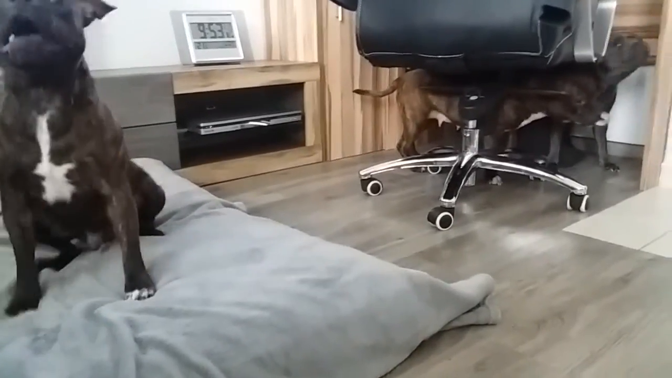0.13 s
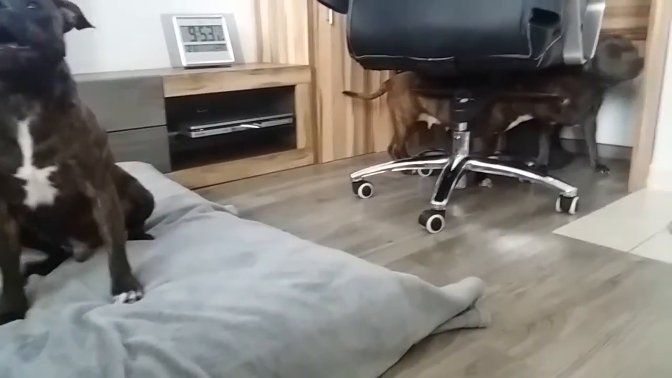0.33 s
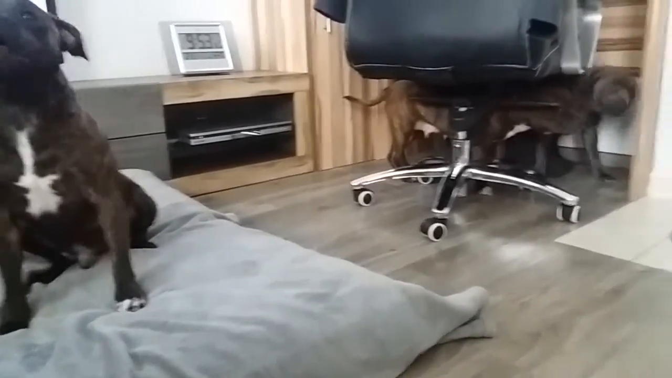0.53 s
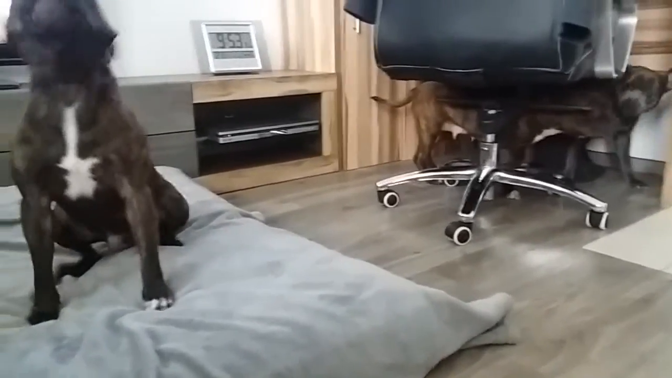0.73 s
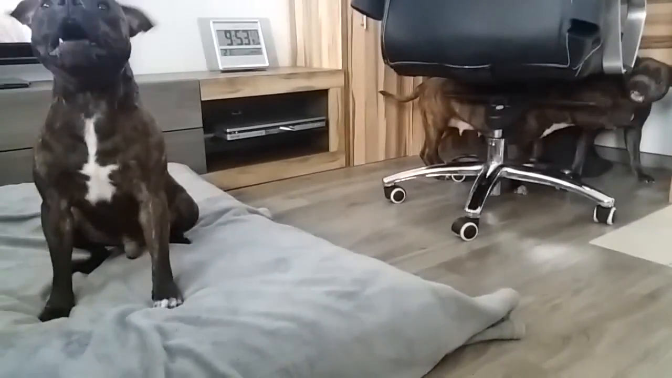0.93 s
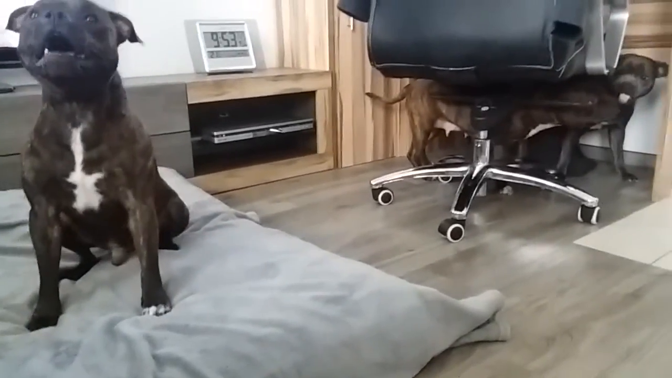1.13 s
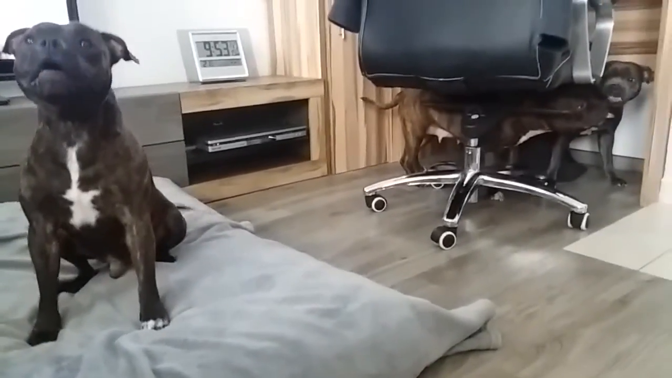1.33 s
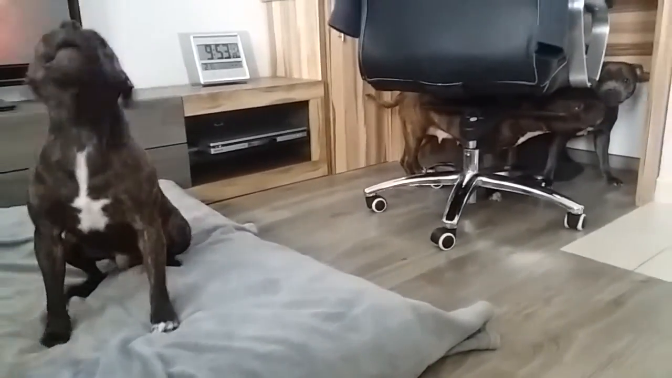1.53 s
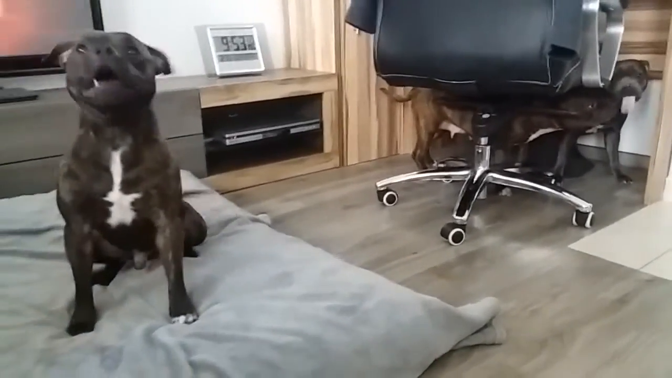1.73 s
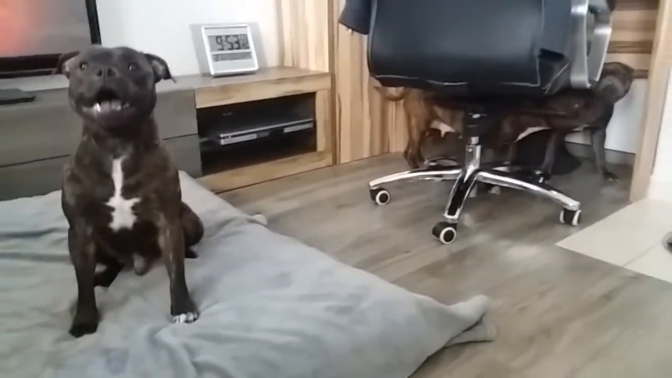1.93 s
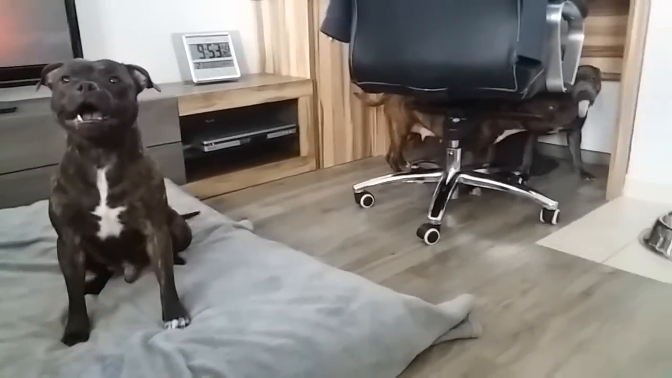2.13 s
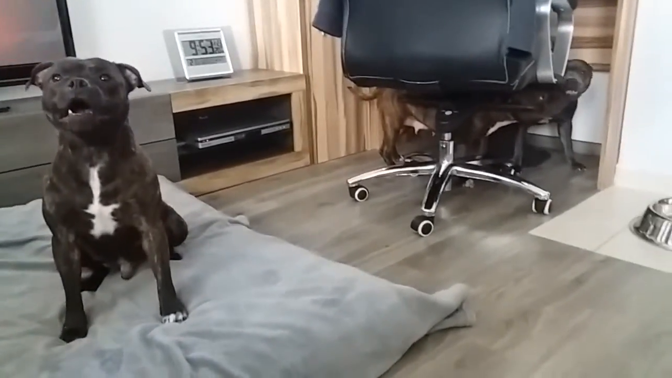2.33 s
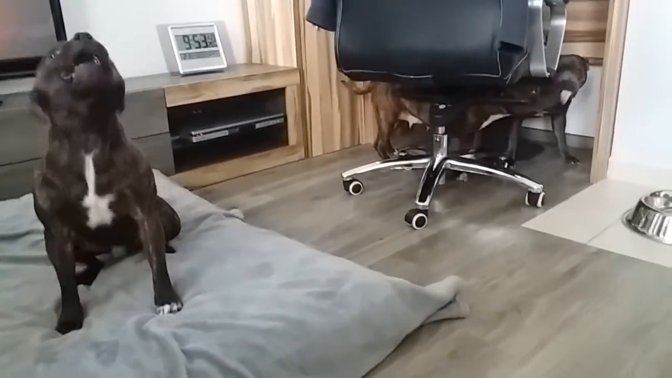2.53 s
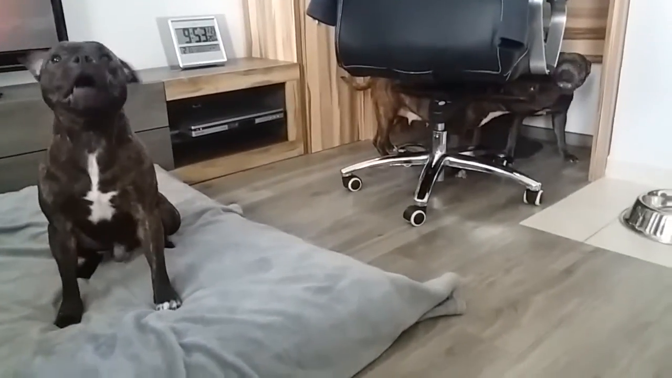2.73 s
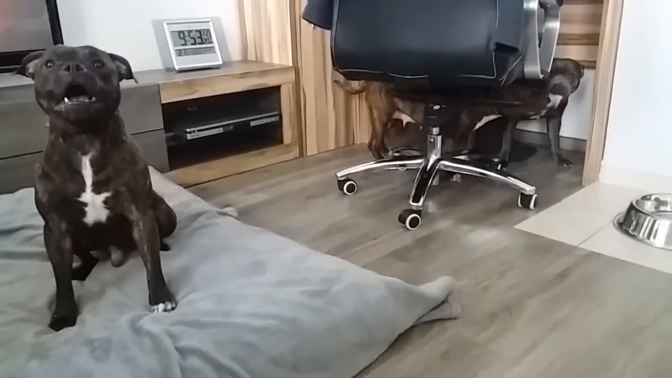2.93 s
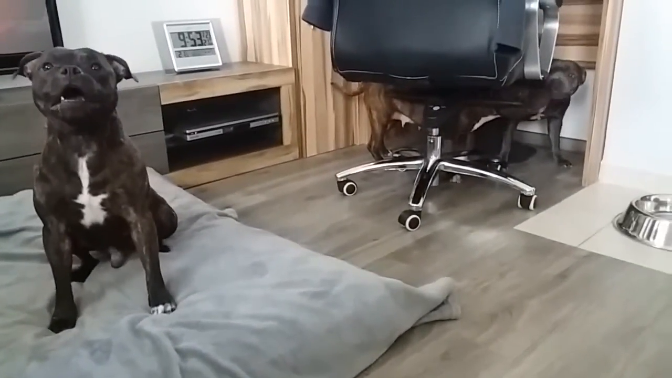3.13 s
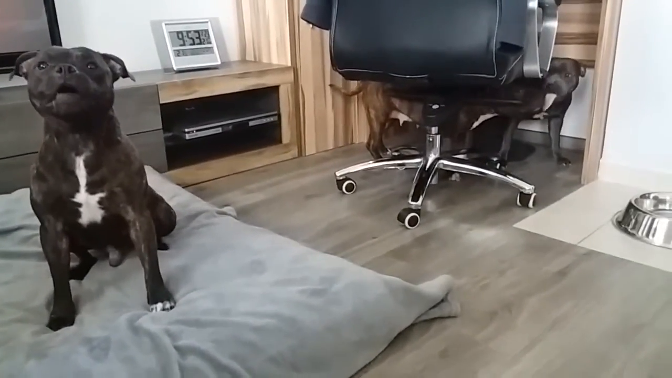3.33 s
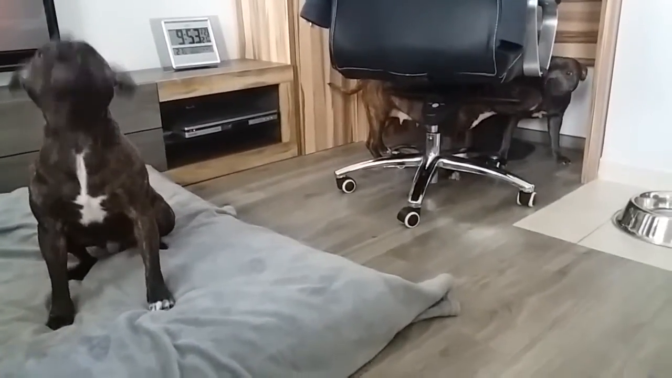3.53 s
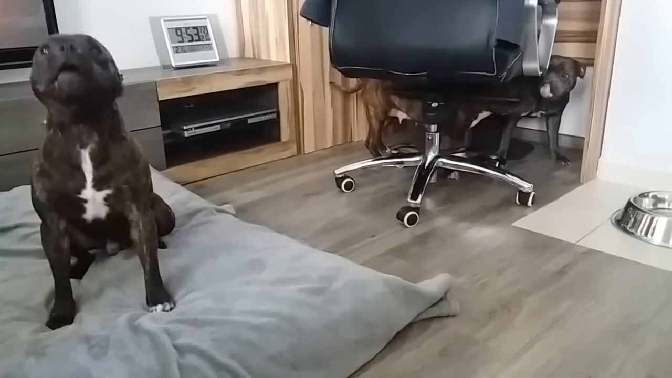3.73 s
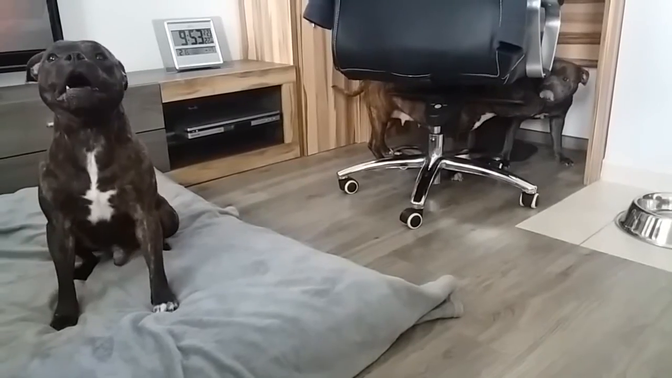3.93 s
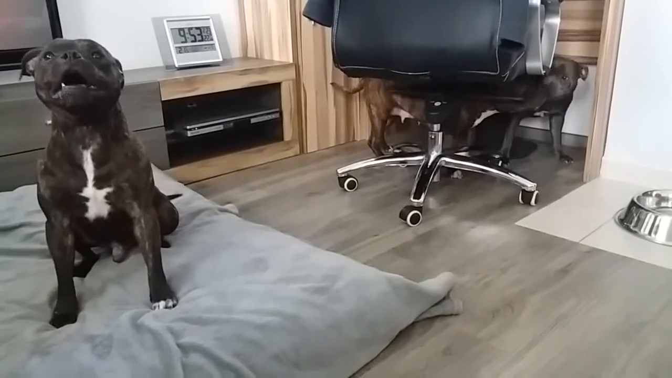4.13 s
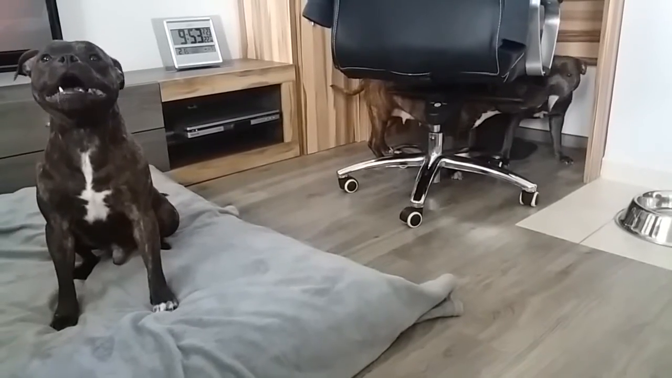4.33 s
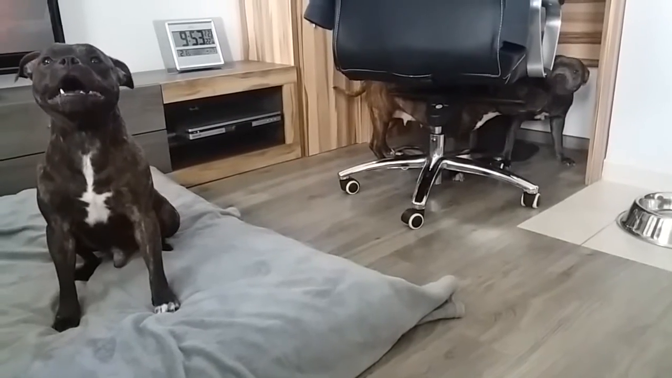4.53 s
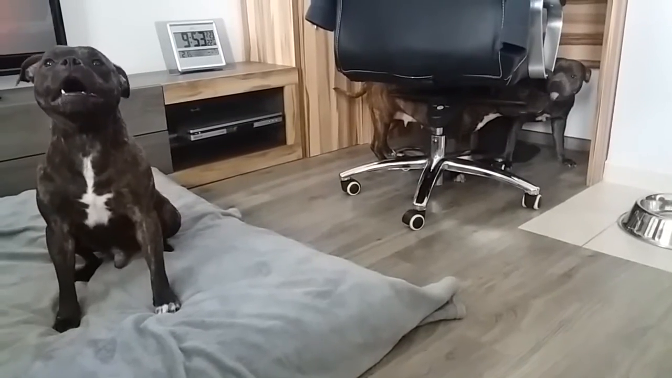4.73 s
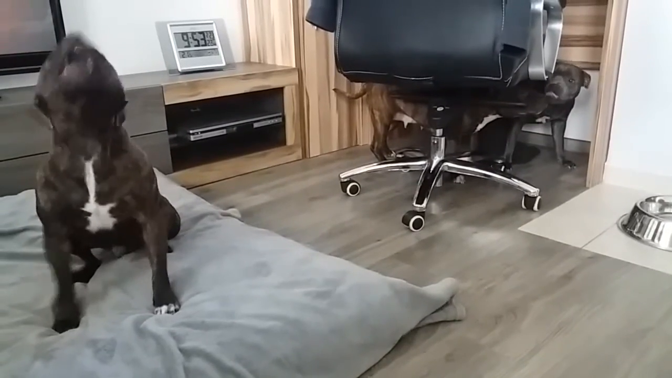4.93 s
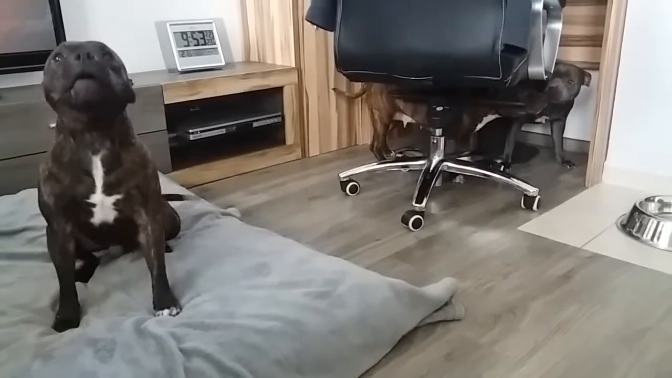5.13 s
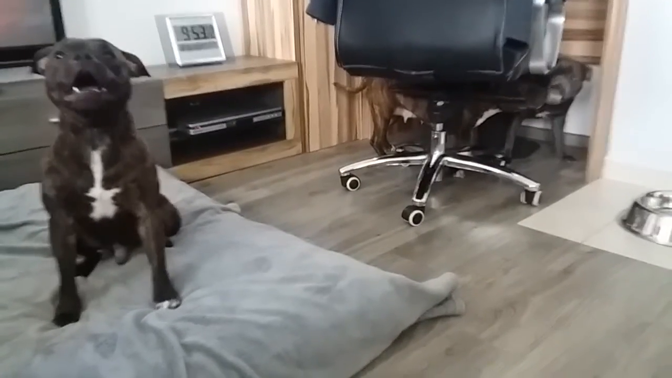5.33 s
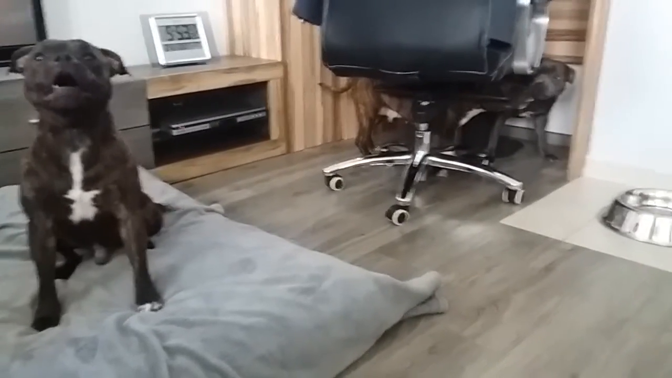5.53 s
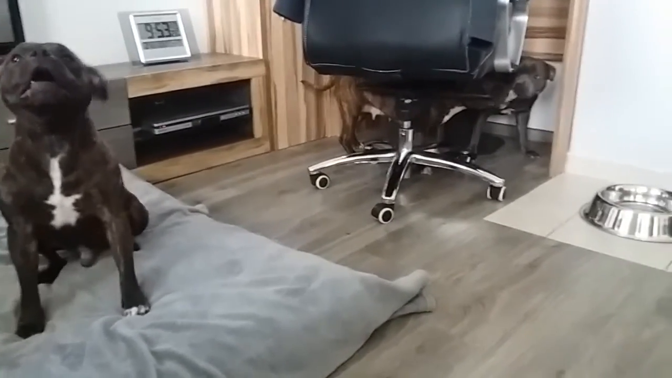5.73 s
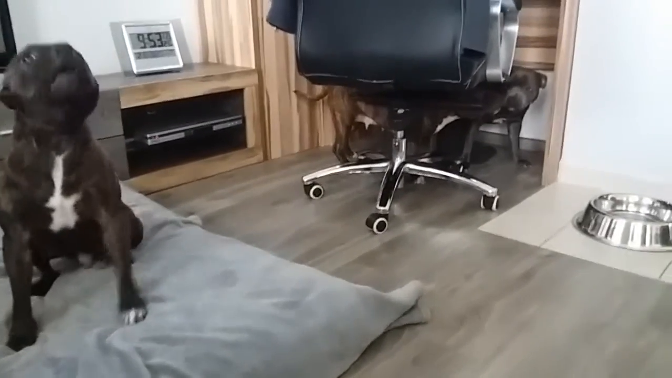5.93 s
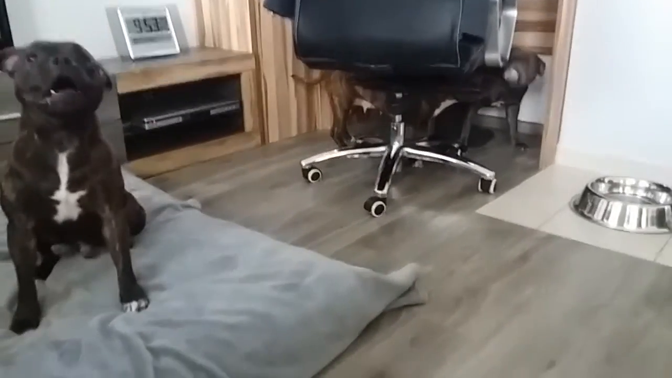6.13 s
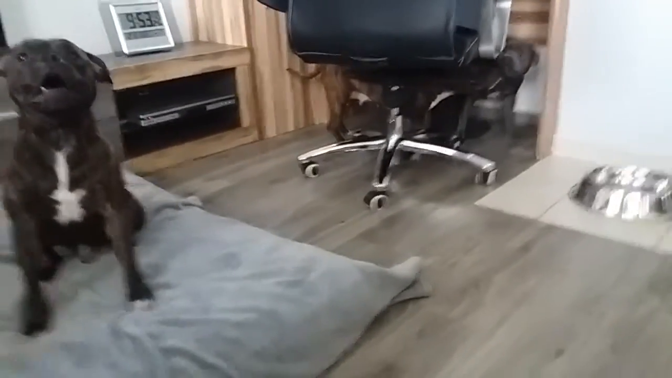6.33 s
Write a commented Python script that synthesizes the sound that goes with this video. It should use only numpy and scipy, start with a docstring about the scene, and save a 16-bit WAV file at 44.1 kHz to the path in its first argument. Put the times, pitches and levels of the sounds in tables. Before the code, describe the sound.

In a quiet living room with a hard floor, the echo of a bark dies away while loose metal jingles faintly. A stocky dog, close to the hand-held microphone, then gives short, hoarse single barks at about 0.6, 1.5, 2.5, 3.5, 4.9 and 5.8 seconds. Each opens with a small snap of the lips, the last four also with a tiny rising squeak. Some have a soft huff before or a breathy rasp after, and the room rings briefly after each one. Fingers tick and bump on the microphone's case: lightly near the start and at 1.1 and 4.1 seconds, then with a sharp click at 5.3 seconds and a few smaller ticks after it. A faint low rumble swells toward the end. At about 6.2 seconds the metal rattles again, briefly and louder, over the soft hush of the house.

```python
"""A living room with a hard floor: a stocky dog barks hoarsely, close to a hand-held camera.
Of its seven barks, the first is heard only as an echo. The others open with a snap of the lips, the last
four with a rising squeak, then swell, hold and drop away as the mouth moves. Some have a soft huff
before or a rasp after, and the room rings after each. Fingers tick and bump on the camera's case, a low
rumble comes and goes, and loose metal rattles and rings, faintly at first and louder at the end."""
import sys
import numpy as np
from scipy import signal
from scipy.fft import rfft, irfft
from scipy.io import wavfile
from scipy.ndimage import uniform_filter1d, minimum_filter1d

SR = 44100
rng = np.random.default_rng(int(sys.argv[2]) if len(sys.argv) > 2 else 0)


def unload_audio(sound):
    """Save the sound as a 16-bit wav file, at the path given as the first command line argument."""
    columns = np.transpose(np.atleast_2d(sound))
    # keep every value between -1 and 1, then stretch to whole-number steps
    steps = np.round(np.clip(columns, -1, 1) * 32767)
    wavfile.write(sys.argv[1], SR, steps.astype(np.int16))


N = 281308
LEAD = SR // 2  # spare samples for sounds that begin before time zero
FRAMES = dict(nperseg=1024, noverlap=896)  # how sound is sliced for filters that change over time


def dog():
    """All the dog's sounds: barks, with huffs, lip snaps, squeaks and rasps around them."""
    # t/s, base pitch/Hz, clean tone/dB, body/dB, cough/dB, swell depth/dB, swell/s, hold until/s,
    # effort/dB, jaw opening/factor, hiss/dB, hiss sag/(dB/s), jet/dB, teeth/dB, lip opening/factor
    barks = [(-0.18, 306.3, -23, -2, 9, 22.5, 0.025, 0.11, -13.5, 1.024, -29.5, 48, -14, -60, 0.99),
             (0.623, 346, -8.5, 0.5, 2.5, 27, 0.017, 0.096, -12.5, 1.062, -37, -56, 1, -59.5, 0.99),
             (1.471, 315, -4, 2.5, -5, 35.5, 0.039, 0.11, -14, 0.91, -39, 6, -9, -70, 0.96),
             (2.484, 317.2, 1, 0, 2.5, 21, 0.025, 0.12, -13, 1.068, -29.5, 41, 2.5, -63, 0.98),
             (3.532, 310.5, -13, -0.5, -7, 27.5, 0.0199, 0.13, -14.5, 1.04, -32, -10, 4, -63, 1.0),
             (4.939, 325.5, -3.5, -1.5, -3, 23, 0.013, 0.1, -12, 1.127, -25.5, 89, -1, -58.5, 0.99),
             (5.821, 303.1, -4, -0.5, -0.5, 22.5, 0.017, 0.093, -10.5, 1.103, -27, 129, -7, -59, 0.97)]
    # soft breaths before a bark: t/s, length/s, level/dB
    huffs = [(2.403, 0.06, -47), (4.747, 0.075, -52), (5.737, 0.061, -48)]
    # tone colour of a huff: f/Hz, level/dB
    huff_spectrum = [(200, -34.5), (750, 1), (1500, -7), (2300, -3.5), (3500, -10.5), (4400, -1.5),
                     (5500, -17.5), (12000, -53)]
    # the lips breaking open: t/s, length/s, level/dB
    snaps = [(0.629, 0.024, -41.5), (1.506, 0.021, -43.5), (2.489, 0.023, -35), (3.549, 0.018, -33.5),
             (4.95, 0.026, -37.5), (5.823, 0.034, -47.5)]
    # rising squeaks that open the last four barks: t/s, length/s, top f/Hz, level/dB
    squeaks = [(2.497, 0.032, 4650, -32.5), (3.55, 0.026, 4555, -32), (4.946, 0.04, 5080, -28.5),
               (5.831, 0.034, 5080, -29.5)]
    # rasping breaths after a bark: t/s, length/s, level/dB
    rasps = [(1.627, 0.033, -41.5), (3.042, 0.14, -64), (4.093, 0.085, -59), (5.1, 0.1, -40)]
    # tone colour of a rasp: f/Hz, level/dB
    rasp_spectrum = [(500, -19), (2000, 5), (3800, 1.5), (4900, 6.5), (6300, 0.5), (8500, -11),
                     (14000, -53)]
    track = np.zeros(LEAD + N)
    for start, *row in barks:
        add(track, start, bark(*row))
    for start, *row in huffs:
        add(track, start, breath(*row, huff_spectrum))
    for start, *row in snaps:
        add(track, start, lip_snap(*row))
    for start, *row in squeaks:
        add(track, start, squeak(*row))
    for start, *row in rasps:
        add(track, start, breath(*row, rasp_spectrum))
    return signal.lfilter(*signal.butter(3, 105, "high", fs=SR), track)  # the dog's sounds carry no deep bass


def bark(pitch_hz, clean_db, body_db, cough_db, depth_db, swell_s, hold_s, level_db, jaw, *hiss_settings):
    """One bark: a rough voice passes through the moving mouth, joined by a hiss and a grunt."""
    t, effort_db, mouth = bark_motion(depth_db, swell_s, hold_s, level_db, jaw)
    push_db = effort_db + 12
    wobble, shake, air = rng.standard_normal((3, SR // 2))[:, :len(t)]
    pitch = pitch_hz * np.exp(0.007 * push_db)  # a harder push is higher
    wobble = evened(uniform_filter1d(wobble, size=120))
    buzz = vocal_folds(pitch, wobble, shake, air)
    voice = throat(buzz, t, mouth, push_db, body_db, cough_db)
    # at the bark's height, the tone at twice the pitch locks onto the main resonance and sounds clean
    clean = np.sqrt(2) * np.sin(4 * np.pi * np.cumsum(pitch * (1 + .1 * wobble)) / SR)
    voice += clean * gain_of(clean_db) * np.exp(-((t - 0.72 * hold_s) / 0.036) ** 2)
    hiss_swell = gain_of(-39 * np.exp(-t / (0.64 * swell_s)))
    hissing = hiss(t, hold_s, *hiss_settings) * hiss_swell
    return (voice * gain_of(effort_db) + hissing + grunt(len(t))) * signal.windows.tukey(len(t), .03)


def bark_motion(depth_db, swell_s, hold_s, level_db, jaw, release_s=0.048, release_db_per_s=451.5):
    """The effort swells, holds and dies; the mouth springs open, then starts to close after the hold."""
    shut, open_s, close_per_s = 0.22, 0.014, 0.68
    t = np.arange(0, hold_s + release_s, 1 / SR)
    after_hold = np.maximum(t - hold_s, 0)
    effort_db = level_db - depth_db * np.exp(-t / swell_s) - release_db_per_s * after_hold
    mouth = jaw * (1 - shut * np.exp(-(t / open_s) ** 2) - close_per_s * after_hold)
    return t, effort_db, mouth


def vocal_folds(pitch, wobble, shake, air, jitter=0.1433, hoarseness=.62, shake_db=3):
    """The folds in the throat beat unevenly and let a puff of air through on each beat."""
    cycles = np.cumsum(pitch * (1 + jitter * wobble)) / SR
    buzz = evened(sum(np.cos(2 * np.pi * k * cycles) for k in range(1, 26)))
    puffs = evened((.5 + np.exp(-(cycles % 1) / 0.79)) * air)
    tremble = gain_of(shake_db * evened(uniform_filter1d(shake, size=250)))
    return ((1 - hoarseness) * buzz / 2 + hoarseness * puffs) * tremble


def throat(buzz, t, mouth, push_db, body_db, cough_db, body_hz=900, cough_hz=1300, cough_s=0.038):
    """Throat and mouth favour some frequencies (resonances), which rise as the mouth opens."""
    # resonances of throat and mouth: f/Hz, width/Hz, level/dB
    peaks = [(150, 45, -36), (540.3, 79.6, 0), (628, 63.4, 4.5), (770, 110, -6), (1038, 324, -4.5),
             (1347, 414, -13), (1660, 110, -20), (1980, 560, -31), (2723, 170, -29), (3060, 180, -34)]
    hz, when, spectra = signal.stft(buzz, SR, **FRAMES)
    hz = hz[:, None]
    opening = np.interp(when, t, mouth)
    octaves = np.log2(np.clip(hz, 600, 3000) / 600)
    tilt = gain_of(0.021 * np.interp(when, t, push_db) * octaves)  # a harder push is brighter
    body = gain_of(body_db * np.exp(-(4 * (hz / body_hz - 1)) ** 2))  # the tongue shapes the middle
    # the cough sets how harsh the first burst is
    cough = gain_of(cough_db * np.exp(-(2 * np.log(hz / cough_hz + 1e-9)) ** 4 - (when / cough_s) ** 4))
    return steady_sound(spectra * resonances(peaks, hz / opening) * tilt * body * cough, len(t))


def hiss(t, hold_s, db, sag_db_per_s, jet_db, teeth_db, lips, release_db_per_s=453):
    """A jet of air rasps through the muzzle, and the bared teeth fizz last."""
    # high resonances of the muzzle: f/Hz, width/Hz, level/dB
    peaks = [(4500, 180, -0.5), (4874, 335, 5.5), (5400, 490, -17), (6320, 310, -9.5), (7215, 180, -9),
             (7960, 830, -17.5)]
    jet_peak, teeth_peak = (4700, 430, jet_db), (11000, 3200, 0)  # same columns
    air = rng.standard_normal(SR // 2)[:len(t)]
    hz, when, spectra = signal.stft(air, SR, **FRAMES)
    hz = hz[:, None]
    # the resonances leap up as the lips part, then sink
    arch = lips * (1.0596 - 0.17 * np.exp(-(t / 0.028) ** 2) - .6 * t)
    muzzle = resonances(peaks + [jet_peak], hz / np.interp(when, t, arch))
    # narrow lips add treble
    narrow_db = 150 * max(1 - lips, 0) * np.interp(hz, [5400, 5900, 8500, 11000], [0, 1, 1, 0])
    jet = steady_sound(spectra * muzzle * gain_of(narrow_db), len(t)) * gain_of(db - sag_db_per_s * t)
    teeth = steady_sound(spectra * resonances([teeth_peak], hz), len(t))
    teeth *= gain_of(teeth_db - 90 * np.maximum(hold_s - t, 0))
    release = gain_of(-release_db_per_s * np.maximum(t - hold_s, 0))
    return (jet + teeth) * release * flutter(len(t), depth_db=2.4)


def grunt(size, db=-37, fade_s=0.024):
    """The chest thumps as the air is first pushed out."""
    t = np.arange(size) / SR
    low_band = signal.butter(2, [130, 300], "band", fs=SR, output="sos")
    thump = signal.sosfilt(low_band, rng.standard_normal(SR // 2))
    return gain_of(db) * evened(thump)[:size] * np.exp(-t / fade_s)


def breath(length_s, db, spectrum):
    """A short swell of air through the muzzle: a huff or a rasp."""
    size = int(length_s * SR)
    air = coloured(rng.standard_normal(SR // 4), spectrum)[:size]
    return gain_of(db) * air * signal.windows.tukey(size, .7)


def lip_snap(length_s, db):
    """A grainy spit of air as the lips break open."""
    # resonances at the lips: f/Hz, width/Hz, level/dB
    peaks = [(3247, 82, 1.5), (4480, 140, -3.5), (4940, 210, 1.5), (5770, 340, -3)]
    size = int(length_s * SR)
    air = resonated(rng.standard_normal(SR), peaks)[:size]
    return gain_of(db) * evened(air * flutter(size, depth_db=4)) * signal.windows.tukey(size, .2)


def squeak(length_s, top_hz, db, start_hz=3980, quiver=0.017):
    """A hoarse whistle that shoots upwards and swells as the mouth springs open."""
    size = int(length_s * SR)
    progress = np.linspace(0, 1, size)
    hz = start_hz + (top_hz - start_hz) * progress ** 0.74
    hz *= 1 + quiver * (flutter(size, depth_db=5) - 1)
    whistle = np.sin(2 * np.pi * np.cumsum(hz) / SR)
    swell = np.sin(np.pi * progress ** 1.9)
    return gain_of(db) * evened(whistle * swell * flutter(size, depth_db=5))


def flutter(size, depth_db):
    """Uneven flapping of the lips, which breaks a stream of air into grains."""
    flaps = np.convolve(rng.standard_normal(SR // 2), np.hanning(220), "same")
    return evened(gain_of(depth_db * evened(flaps)))[:size]


def rattle(length_s, db, bright_db, clang_db, ring_db, contacts_per_s=2200, settle_s=0.18):
    """Loose metal makes a burst of tiny hits, clangs under them and swells into a wavering ring."""
    # tone colour of the hits: f/Hz, level/dB
    clatter_spectrum = [(35, -32), (60, -14), (210, -1), (705, 3), (1700, -15.5), (4000, 1.5),
                        (8300, -10.5), (15500, -31.5)]
    # the metal's strong, short-lived resonances: f/Hz, width/Hz, level/dB
    clang_peaks = [(2245, 27, 0), (2950, 180, -0.5)]
    t = np.arange(2 * SR) / SR
    hits, signs, sizes = rng.random((3, len(t)))
    contacts = (hits < contacts_per_s / SR) * np.sign(signs - .5) * gain_of(-2 * np.log(sizes + .02))
    tilted = [(hz, level + bright_db * np.log2(hz)) for hz, level in clatter_spectrum]
    fade = decay(np.maximum(t - length_s, 0), settle_s)
    clatter = coloured(contacts, tilted) * fade
    clang = evened(resonated(contacts, clang_peaks)) * np.sqrt(fade)
    swell, ending = np.minimum(2 * t / length_s, 1), np.minimum(2 * (t[-1] - t), 1)
    ringing = (shimmer(t) + metal_ring(t)) * swell * ending
    return gain_of(db) * clatter + gain_of(clang_db) * clang + gain_of(ring_db) * ringing


def metal_ring(t, twin_gain=0.63):
    """Each of the metal's tones is a close pair, so its loudness wavers."""
    # the metal's main tones: f/Hz, level/dB, time to fade by 60 dB/s
    tones = [(2898, -1, 1.2), (3092, -10, 4), (3316, -7, 5), (3612, -12, 3.5), (4371, -16, 2.5),
             (4630, -17, 5), (8586, -24, 3), (10300, -28, 2.8)]
    ringing = np.zeros(len(t))
    for hz, db, t60 in tones:
        split_hz, phase = rng.uniform(1.76, 24), rng.random()
        twin = twin_gain * np.sin(2 * np.pi * (hz + split_hz) * t)
        ringing += gain_of(db) * (np.sin(2 * np.pi * (hz * t + phase)) + twin) * decay(t, t60)
    return ringing


def shimmer(t, count=32):
    """A swarm of weak tones that the thin metal keeps long after it was struck."""
    # tone colour of the swarm: f/Hz, level/dB
    spectrum = [(2000, -13), (3200, -6), (5500, -7.5), (9000, -26.5)]
    low_hz, high_hz = spectrum[0][0], spectrum[-1][0]
    offsets, phases = rng.random((count, 2)).T
    tones_hz = low_hz * (high_hz / low_hz) ** ((np.arange(count) + offsets) / count)
    swarm = sum(gain_of(look_up(spectrum, hz)) * np.sin(2 * np.pi * (hz * t + phase))
                for hz, phase in zip(tones_hz, phases))
    return gain_of(-4.5) * swarm * decay(t, t60=3.7)


def touch(tick_db, tick_hz, t60, bump_db):
    """A finger makes a dry tick of plastic and a soft bump of the case, right at the microphone."""
    # low tones of the case: f/Hz, level/dB, time to fade by 60 dB/s
    case_tones = [(164, -1, 0.026), (244, -0.5, 0.019)]
    tick = signal.lfilter(*signal.butter(3, 6500, fs=SR), ring(tick_hz, t60))
    bump = sum(gain_of(db) * ring(hz, fade_s) for hz, db, fade_s in case_tones)
    soft_start = 1 - np.exp(-np.arange(SR) / SR / 0.0014)
    knock = gain_of(tick_db) * tick + gain_of(bump_db) * bump * soft_start
    return signal.lfilter(*signal.butter(2, 80, "high", fs=SR), knock)


def rumble(rise_s=0.025, fade_s=0.2, quiet_db=-76.5):
    """A faint, low rumble that swells with nearby movement."""
    # swells of the rumble: peak t/s, level/dB
    peaks = [(0.028, -52.5), (5.2, -51.5), (5.8, -47.5), (6.18, -40)]
    # tone colour of the rumble: f/Hz, level/dB
    spectrum = [(20, -11), (60, -4.5), (130, 2.5), (280, -7.5), (500, -7.5), (2000, -60)]
    t = np.arange(N) / SR
    swells = sum(gain_of(db) * np.exp(-np.maximum((peak - t) / rise_s, (t - peak) / fade_s))
                 for peak, db in peaks)
    return coloured(rng.standard_normal(N), spectrum) * (gain_of(quiet_db) + swells)


def room_echo(sound, echoes_per_s=4000, early_db=3, early_s=0.0021, build_s=0.0019):
    """Floor and furniture reflect first; then a dense tail of echoes and the room's own tones die away."""
    # how long the room rings: f/Hz, time to fade by 60 dB/s
    fade_times = [(150, 0.5), (1150, 0.71), (2800, 1), (5000, 0.64), (7500, 0.62), (14000, 0.42)]
    # the room's own tones (standing waves): f/Hz, level/dB
    tones = [(408, -35), (764, -33), (1051, -30), (1204, -30), (1561, -25)]
    t = np.arange(SR) / SR
    echoes = rng.choice([-1., 1.], SR) * (rng.random(SR) < echoes_per_s / SR)
    echoes *= 1 + gain_of(early_db) * np.exp(-t / early_s)
    hz, when, spectra = signal.stft(echoes, SR, nperseg=256)
    spectra *= decay(when, look_up(fade_times, hz)[:, None])
    spectrum = rfft(signal.istft(spectra, SR, nperseg=256)[1][:SR])
    # even out the echo's tone colour
    tail = irfft(spectrum / np.sqrt(uniform_filter1d(abs(spectrum) ** 2, size=90)), SR)
    tail *= (1 - np.exp(-t / build_s)) * np.minimum(4 * (1 - t), 1) ** 4
    standing = sum(gain_of(db) * evened(ring(f, look_up(fade_times, f))) for f, db in tones)
    response = gain_of(-1) * (evened(tail) + standing) / np.sqrt(SR)
    return signal.fftconvolve(sound, response)[:len(sound)]


def hush():
    """The quiet background noise of the house."""
    # tone colour of the background: f/Hz, level/dB
    spectrum = [(15, -42.5), (25, -8.5), (101, -1.5), (140, -6.5), (430, -11), (598, -6), (919, -6.5),
                (1200, -14), (3530, -16.5), (15500, -55.5)]
    # its loudness over time: t/s, level/dB
    levels = [(0, -48.5), (2.201, -56), (4.7, -56), (6.38, -49.5)]
    level_db = np.interp(np.arange(N) / SR, *np.transpose(levels))
    return coloured(rng.standard_normal(N), spectrum) * gain_of(level_db)


def gain_of(db):
    """Turns decibels into a factor to multiply by."""
    return 10 ** (np.asarray(db) / 20)


def evened(x):
    """Scales a signal to an average power of one."""
    return x / np.sqrt(np.mean(x ** 2) + 1e-20)


def look_up(table, hz):
    """Reads between the rows of a table, on a scale of octaves."""
    table_hz, values = np.transpose(table)
    return np.interp(np.log(hz + 1), np.log(table_hz), values)


def coloured(x, spectrum):
    """Gives a sound a tone colour, at an average power of one."""
    hz = np.fft.rfftfreq(len(x), 1 / SR)
    return evened(irfft(rfft(x) * gain_of(look_up(spectrum, hz)), len(x)))


def resonances(peaks, hz):
    """How strongly a set of steep-sided resonances passes each frequency."""
    return np.sqrt(sum(gain_of(db) ** 2 / (1 + ((hz - f) / width) ** 2) ** 3 for f, width, db in peaks))


def resonated(x, peaks):
    """Passes a sound through resonances that stay still."""
    return irfft(rfft(x) * resonances(peaks, np.fft.rfftfreq(len(x), 1 / SR)), len(x))


def steady_sound(spectra, size):
    """Joins the spectra of short slices into a sound of even loudness."""
    x = signal.istft(spectra, SR, **FRAMES)[1][:size]
    return x / np.sqrt(abs(uniform_filter1d(x ** 2, size=700)) + 1e-12)


def decay(t, t60):
    """A fade that loses 60 dB every t60 seconds."""
    return np.exp(-np.log(1000) * t / t60)


def ring(hz, t60):
    """One second of a dying tone."""
    t = np.arange(SR) / SR
    return np.sin(2 * np.pi * hz * t) * decay(t, t60)


def add(track, start_s, sound):
    """Adds a sound to a track at the given time."""
    part = track[LEAD + round(start_s * SR):][:len(sound)]
    part += sound[:len(part)]


def scene():
    """Dog and metal echo in the room; touches, rumble and hush are added without echo."""
    # rattles of the metal: t/s, length/s, clatter/dB, brightness/(dB/octave), clang/dB, ringing/dB
    rattles = [(-0.2, 0.16, -41, 2, -43, -47.5), (0.209, 0.062, -49, -1.5, -70, -58.5),
               (6.141, 0.014, -34, 3, -56, -70), (6.157, 0.051, -33.5, 0, -34.5, -68),
               (6.216, 0.03, -38, -5.5, -50, -56.5)]
    # fingers on the case: t/s, tick/dB, tick f/Hz, time for the tick to fade by 60 dB/s, bump/dB
    touches = [(0.218, -51, 1034, 0.0047, -20), (0.2894, -53, 2900, .004, -32),
               (0.374, -50, 3300, 0.0021, -33), (1.1398, -17.5, 4600, 0.0025, -75),
               (4.136, -38, 4330, 0.004, -31.5), (5.3468, -1, 960, 0.002, -25),
               (5.3476, -7, 2920, 0.0018, -35), (5.5091, -28.5, 4880, 0.007, -36),
               (5.609, -31, 4600, 0.0054, -32.5), (5.6181, -27, 4220, 0.0013, -32.5),
               (5.708, -41, 4300, 0.0043, -32)]
    barking = dog()
    metal, fingers = np.zeros((2, LEAD + N))
    for start, *row in rattles:
        add(metal, start, rattle(*row))
    for start, *row in touches:
        add(fingers, start, touch(*row))
    echo = room_echo(barking + gain_of(-14) * metal)
    mix = gain_of(-0.5) * barking + metal + echo + fingers
    return (mix[LEAD:] + hush() + rumble())[None]


def record(dry, ceiling=.85, fade_in_s=.004, top_hz=15720):
    """Turns down the loudest peaks, fades in briefly and cuts the highest treble."""
    gain = np.minimum(1, ceiling / (abs(dry) + 1e-9))
    gain = minimum_filter1d(gain, size=400)  # stay low around each peak
    gain = uniform_filter1d(uniform_filter1d(gain, size=200), size=200)
    gain *= np.minimum(np.arange(N) / SR / fade_in_s, 1)
    treble_cut = signal.firwin(511, top_hz, window=("kaiser", 9), fs=SR)
    return signal.oaconvolve(dry * gain, treble_cut[None], "same")


dry = scene()
out = record(dry)
unload_audio(out)
```